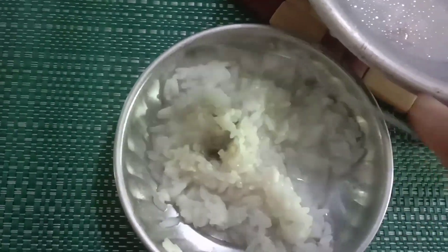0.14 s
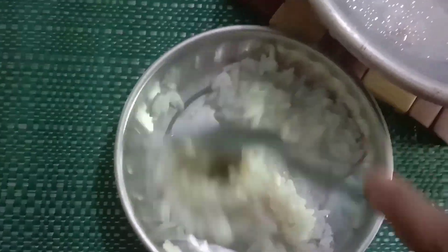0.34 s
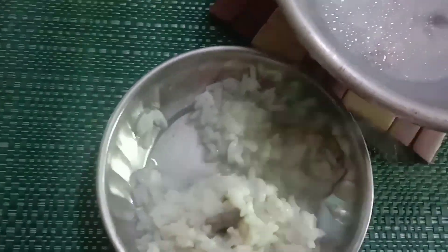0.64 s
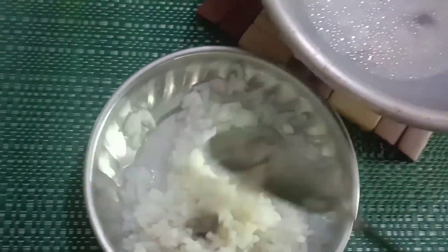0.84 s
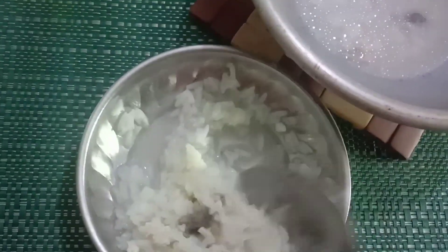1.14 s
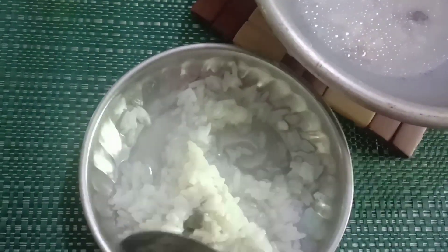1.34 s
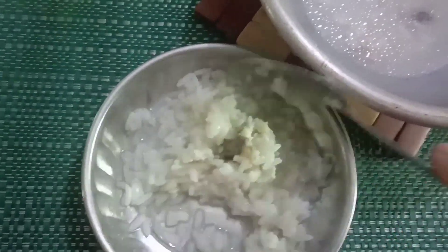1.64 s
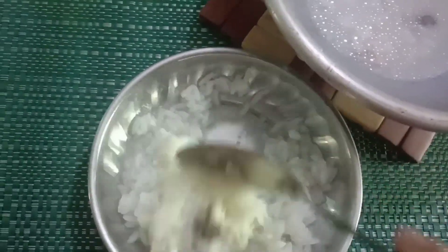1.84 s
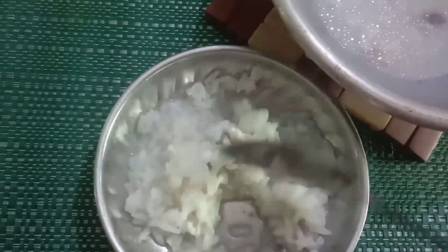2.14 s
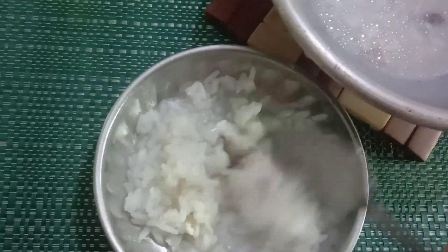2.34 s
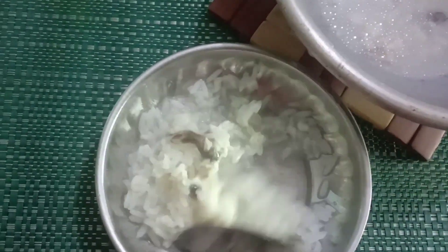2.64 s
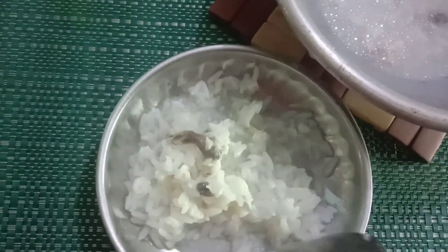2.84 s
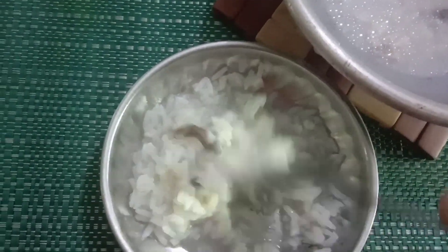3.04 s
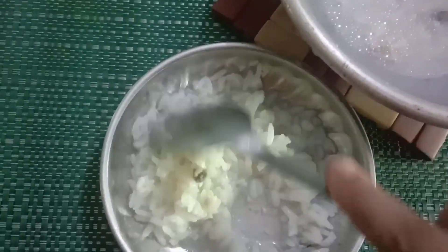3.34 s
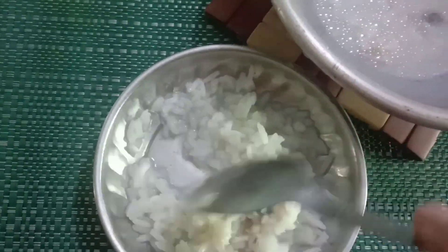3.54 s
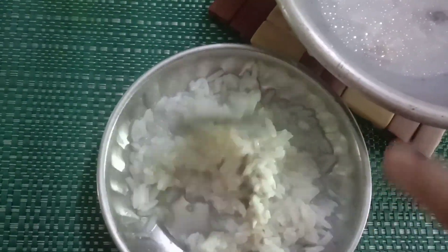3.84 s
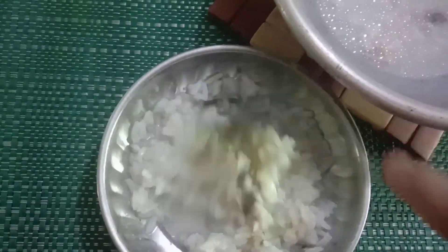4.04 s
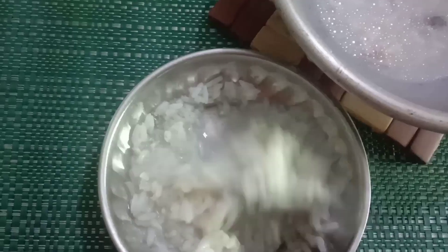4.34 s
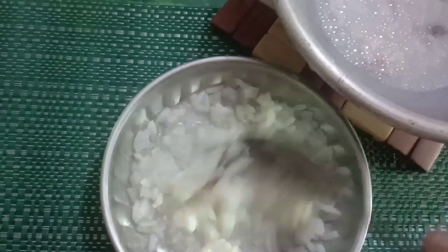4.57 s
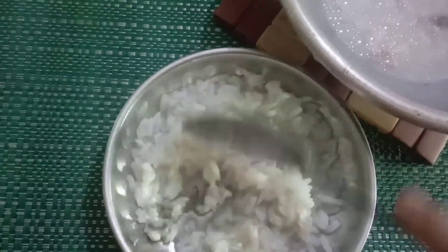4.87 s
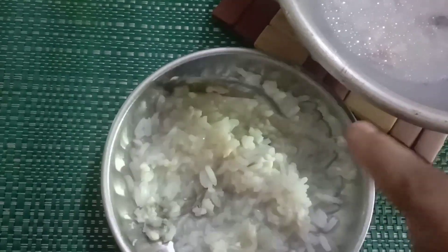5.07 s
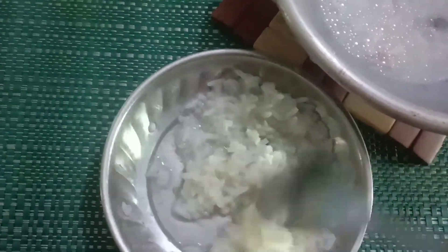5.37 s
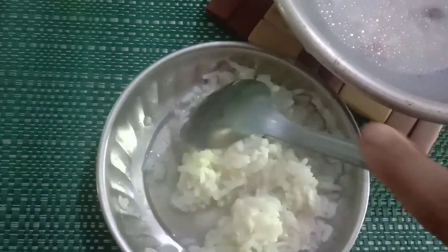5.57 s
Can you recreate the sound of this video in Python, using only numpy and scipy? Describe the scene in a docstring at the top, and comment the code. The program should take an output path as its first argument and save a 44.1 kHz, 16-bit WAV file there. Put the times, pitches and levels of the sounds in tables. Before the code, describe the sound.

A metal spoon clinks and scrapes against a steel plate while mixing cooked rice, over a faint hum in a small room.

```python
"""A steel spoon mixes cooked rice on a steel plate, which stands on a table mat in a small room.
Each impact excites the modes of spoon and plate (a clink) and, through the mat, the table (a soft thud).
Stick-slip friction makes the spoon scrape, and sticky grains tick as they let go. Rice damps the plate,
so it rings out only now and then. Behind it are a low, restless room noise, a faint hiss and hum
and, once, a thin far-off buzz."""
import sys
import numpy as np
from scipy import signal
from scipy.fft import rfft, irfft
from scipy.io import wavfile
from scipy.ndimage import map_coordinates

SR = 44100
rng = np.random.default_rng(int(sys.argv[2]) if len(sys.argv) > 2 else 0)


def store_wav(level_fs):
    """Save 16-bit WAV to argv[1]."""
    pcm = np.round(np.clip(np.atleast_2d(level_fs), -1, 1) * 32767)
    wavfile.write(sys.argv[1], SR, pcm.T.astype(np.int16))


N = 251811
T = np.arange(N) / SR


def amp(db):
    """Converts a level in decibels to an amplitude ratio."""
    return 10 ** (np.asarray(db) / 20)


def unit(x):
    """Normalises to rms 1."""
    return x / np.sqrt(np.mean(x ** 2) + 1e-20)


def read(points, hz):
    """Interpolates a table on a logarithmic frequency axis."""
    f, value = np.transpose(points)
    return np.interp(np.log(hz + 1), np.log(f + 1), value)


def add(mix, start_s, sound):
    """Superposition: adds a sound to the mix from a given time."""
    part = mix[max(round(start_s * SR), 0):][:len(sound)]
    part += sound[:len(part)]


def colour(x, *spectra):
    """Filters in cascade: their responses in decibels add."""
    hz = np.fft.rfftfreq(len(x), 1 / SR)
    return irfft(rfft(x) * amp(sum(read(s, hz) for s in spectra)), len(x))


def drift(knots_per_s):
    """Random modulation of rms 1, linear between Gaussian values."""
    knots = rng.standard_normal(int(T[-1] * knots_per_s) + 3)
    return unit(np.interp(T * knots_per_s, np.arange(len(knots)), knots))


def patchy(x, depth_db, wide_hz, long_s, size=1024):
    """Spectral modulation: small regions of frequency and time swell and sink at random."""
    frames = dict(fs=SR, nperseg=size, noverlap=size * 3 // 4)
    spectra = signal.stft(x, **frames)[2]
    row, column = np.indices(spectra.shape)
    where = [row * SR / size / wide_hz, column * size / 4 / SR / long_s]
    field = unit(map_coordinates(rng.standard_normal((256, 256)), where, order=1, mode="wrap"))
    return unit(signal.istft(spectra * amp(depth_db * field), **frames)[1][:len(x)])


def fuzzy_tone(hz, blur_per_s, fuzz):
    """Multipath interference: changing paths make a tone flutter in amplitude and phase."""
    paths = 1 + fuzz * (drift(blur_per_s) + 1j * drift(blur_per_s))
    return unit((paths * np.exp(2j * np.pi * hz * T)).real)


def ring(modes, t, spread_db=1.6):
    """Modal decay: damped sinusoids, their balance randomised as by a varying point of contact."""
    hz, db, t60 = np.transpose(modes)[:, :, None]
    envelopes = amp(db + spread_db * rng.standard_normal(hz.shape) - 60 * t / t60)
    return (envelopes * np.sin(2 * np.pi * (hz * t + rng.random(hz.shape)))).sum(0)


# spectrum of the room noise: (frequency [Hz], relative level [dB])
AIR_SPECTRUM = [(25, -40), (60, -33), (95, -10.5), (140, -13), (200, -12.5), (350, -11.5), (600, -17.5),
                (850, -12), (1280, -21), (1520, -14.5), (1900, -32), (2700, -30), (3600, -36), (4200, -56)]


def room_noise(level_db=-56.5, swell_db=0.38, swells_per_s=6):
    """Filtered noise: random modulation makes the low ambient sound restless."""
    noise = colour(rng.standard_normal(N), AIR_SPECTRUM)
    restless = patchy(noise, depth_db=3.4, wide_hz=80, long_s=.09)
    return restless * amp(level_db + swell_db * drift(swells_per_s))


# spectrum of the microphone hiss: (frequency [Hz], relative level [dB])
HISS_SPECTRUM = [(2500, -28), (3700, -12), (4300, -2), (5100, 5), (5700, -14.5), (6400, -9.5), (7000, 0.5),
                 (8000, -2), (9400, -3.5), (10400, -16), (15500, -58)]


def hiss(level_db=-66):
    """Microphone self-noise: a faint, flickering band in the treble."""
    noise = colour(rng.standard_normal(N), HISS_SPECTRUM)
    return amp(level_db) * patchy(noise, depth_db=1.7, wide_hz=220, long_s=.09)


# envelope of the hum: (time [s], relative level [dB])
HUM_ENVELOPE = [(0.0, -55.5), (1.3, -57), (1.4, -51.5), (1.55, -63), (1.73, -63), (1.88, -50), (2.2, -51),
                (2.5, -64), (3.0, -57), (4.7, -59.5), (4.9, -52.5), (5.71, -47.5)]


def hum(hz=354, gain_db=-4.5, waver_db=1.3, wavers_per_s=8):
    """Amplitude modulation: one rough tone swells, sinks and wavers."""
    envelope = amp(np.interp(T, *np.transpose(HUM_ENVELOPE)))
    tone = fuzzy_tone(hz, blur_per_s=36, fuzz=.9)
    return envelope * tone * amp(gain_db + waver_db * drift(wavers_per_s))


# crowded, rice-damped modes of the steel: (frequency [Hz], relative level [dB])
STEEL_RESPONSE = [(50, -58), (200, -11.5), (900, -16), (1500, -3.5), (2200, -6), (3200, -2), (4300, -3),
                  (5400, 0), (6700, 0.5), (7600, 2.5), (8100, -2.5), (8900, 5), (10000, -7.5), (13000, -15),
                  (16000, -22)]


def steel(force, lows_db, highs_db):
    """Forced response of the damped steel: a broad contact adds lows, a sharp edge highs."""
    # every point of contact favours other modes
    point = np.c_[np.arange(0, 16000, 160), 4.6 * rng.standard_normal(100)]
    tilt = [(3500, lows_db), (5200, 0.013), (9300, 0.0091), (11000, highs_db)]
    untilted_rms = np.std(colour(force, STEEL_RESPONSE, point))
    return colour(force, STEEL_RESPONSE, point, tilt) / untilted_rms


# impacts of spoon on plate; the faintest is a pat on the rice. Later dB columns are relative to the level:
# (time [s], level [dB], lows [dB], highs [dB], note frequency [Hz], note [dB], spoon ring [dB],
# plate ring [dB], thud [dB])
IMPACTS = [ (0.2363, -30, 6, 5, 5980, -1.5, -15, -41, -15), (0.346, -29.5, 7, -2, 6660, -5, -15, -44, -31),
           (0.6342, -40, 11, -22, 2600, 0, -34, -9, -32),
           (0.658, -27.5, -1, 8.5, 2520, -18, -6, -19.5, -16),
           (1.0752, -29.5, -13, 3, 3234, -11.5, -22, -50, -29),
           (1.6653, -28.5, -2, 3.5, 5664, 9.5, -33, -3, -50),
           (1.7213, -30.5, -2, -1, 7100, -3, -11, -4, -27),
           (1.7649, -25, 2.5, -7, 7280, -4.5, -39, -55, -39),
           (2.101, -73.5, -9, -12, 864, 23.5, -30, -26, -13),
           (2.2840, -28.5, -4.5, 5.5, 9540, -2.5, -20, -43, -22.5),
           (2.3272, -35.5, -5.5, 12.5, 6370, 2.5, -19, -42, -16.5),
           (2.3664, -32, -3.5, -1, 8600, 0, -20, -43, -24),
           (2.5978, -28, 4.5, -3, 8970, 1.5, -15, -47, -23),
           (2.964, -28.5, -4.5, 3, 8680, 2.5, -12, -36, -20),
           (2.984, -27.5, -1, -2, 6737, -5.5, -30, -54, -22.5),
           (3.333, -48.5, -17, 4, 9240, -4, -13, -20, -8.5),
           (3.4190, -30.5, 1.5, 0, 2490, -4.5, -27, -38, -22),
           (3.4873, -45, 4.5, 6, 3150, -1, -27, -31, -38), (3.677, -27, -5, 6.5, 3360, -9, -5.5, -50, -18),
           (5.0592, -33.5, 4, 3, 6550, -0.5, -9.5, -41, -12),
           (5.2292, -36, 11.5, 9, 2510, -3, -16, -19, -23), (5.2505, -36, 9.5, -5, 3190, -8, -26, -29, -24),
           (5.2800, -50, 19.5, 7, 2900, -14, -24, -30, -18), (5.303, -37, -32, 3, 7600, -3, -27, -37, -38),
           (5.341, -35.5, -3, 4, 8440, -2, -39, -47, -23), (5.7015, -32.5, 5, 2.5, 5730, -20, -5, -30, -28)]


def clinks(hold_s=0.0031, crack_t60=0.023, crack_db=-.5, note_db=2, note_t60=0.049):
    """Impact excitation: the spoon chatters briefly, with a short note set by where it touches."""
    out, t = np.zeros(N), T[:4096]
    chatter = amp(-60 * np.maximum(t - hold_s, 0) / crack_t60)
    chatter *= 1 + 0.2 * np.exp(-t / 0.0025)  # the first impact is the hardest
    for s, db, lows, highs, hz, note, *_ in IMPACTS:
        crack = steel(rng.standard_normal(len(t)), lows, highs) * chatter
        tone = ring([(hz, 0, note_t60)], t, spread_db=0.5)
        add(out, s, amp(db + crack_db) * crack + amp(db + note + note_db) * tone)
    return out


# response of the table under the mat: (frequency [Hz], relative level [dB])
TABLE_RESPONSE = [(40, -58), (90, -29), (134, 4), (175, -11), (260, -5.5), (420, -26), (900, -19),
                  (2000, -98)]


def thuds(swell_s=0.019, fade_s=0.046):
    """Structure-borne sound: each blow passes through the mat, and the table's boom builds and dies."""
    out, t = np.zeros(N), T[:16384]
    envelope = (1 - np.exp(-(t / swell_s) ** 2)) * np.exp(-t / fade_s)
    envelope /= envelope.max()
    envelope_rms = np.sqrt(np.mean(envelope ** 2))
    for s, db, *_, thud in IMPACTS:
        boom = unit(colour(rng.standard_normal(len(t)), TABLE_RESPONSE) * envelope)
        add(out, s, amp(db + thud) * envelope_rms * boom)
    return out


# natural modes of spoon and plate: (frequency [Hz], relative level [dB], 60 dB decay time [s])
SPOON_MODES = [(1515, -18, .2), (4990, -12, .2), (5912, -8, .25), (6290, -12, .18), (6900, -9, .18),
               (7646, -1, .31), (7688, -7, .25), (8678, -10, .26), (8932, -7, .26), (9430, -9, .23),
               (9889, -16, .2), (11075, -12, .21), (12765, -19, .24), (13240, -21, .24)]
PLATE_MODES = [(1308, -10, .1), (1816, -5, .85), (1868, -14, .5), (2226, -3, .5), (2319, -2, .55),
               (2587, -13, .4), (2697, -3, .25), (2738, 2, .26), (3704, -8, .25), (3903, -7, .4),
               (4151, -14, .45), (4775, -7, .1), (5489, -3, .1), (5683, -9, .22), (5927, -11, .38),
               (8409, -16, .3)]


def ringing(spoon_db=2.0, plate_db=-3.0, loss_per_touch_db=2):
    """Free vibration: spoon and plate ring after each blow; every later impact damps what remains."""
    out, t = np.zeros(N), T[:22000]
    times = np.sort([row[0] for row in IMPACTS])
    for s, db, *_, spoon, plate, _ in IMPACTS:
        spoon_ring = amp(spoon + spoon_db) * ring(SPOON_MODES, t)
        plate_ring = amp(plate + plate_db) * ring(PLATE_MODES, t)
        touches = np.searchsorted(times[times > s], s + t)
        add(out, s, amp(db - loss_per_touch_db * touches) * (spoon_ring + plate_ring))
    return out


# reverberation of the small room: (frequency [Hz], 60 dB decay time [s])
REVERB_TIMES = [(150, 0.58), (700, 0.58), (2000, 0.21), (5000, 0.26), (9000, 0.23), (14000, 0.18)]


def room(x, first_s=0.0055, echoes_per_s=4000):
    """Reverberation: dense reflections from near walls, each band decaying at its own rate."""
    t = T[:SR * 2 // 3]
    echoes = rng.choice([-1., 1.], len(t)) * (rng.random(len(t)) < echoes_per_s / SR)
    hz, delay_s, spectra = signal.stft(echoes, SR, nperseg=256)
    decay = amp(-60 * delay_s / read(REVERB_TIMES, hz)[:, None])
    tail = signal.istft(spectra * decay, SR, nperseg=256)[1][:len(t)] * (t > first_s)
    return signal.fftconvolve(x, tail / np.linalg.norm(tail))[:N]


# drags of the spoon's edge over the steel:
# (start [s], hardest moment [s], end [s], level [dB], squeak frequency [Hz], relative squeak level [dB])
DRAGS = [ (0.285, 0.322, 0.36, -48, 8880, -5), (0.375, 0.41, 0.44, -40.5, 5420, -7.5),
         (0.659, 0.667, 0.78, -39, 7670, -4), (1.104, 1.159, 1.174, -47, 3190, -3.5),
         (1.773, 1.817, 1.856, -42, 6430, -4), (2.289, 2.317, 2.43, -46, 10800, -7),
         (2.622, 2.638, 2.72, -46, 5870, -5), (2.989, 3.03, 3.07, -50, 8760, 4.5),
         (3.383, 3.48, 3.48, -41.5, 7780, -4.5), (3.68, 3.697, 3.805, -37, 7610, -1),
         (5.12, 5.15, 5.22, -43, 4180, -7), (5.188, 5.22, 5.25, -45, 9100, -7),
         (5.258, 5.332, 5.38, -43.5, 8800, -9)]


def scrapes(slips_per_s=1400, ends_db=-11, squeak_t60=.03):
    """Stick-slip friction: tiny, uneven slips excite changing modes of the steel and a short squeak."""
    out, t = np.zeros(N), T[:16384]
    for start, hardest, end, db, hz, squeak_db in DRAGS:
        slips = (rng.random(len(t)) < slips_per_s / SR) * rng.choice([-1, 1], len(t))
        slips = slips * amp(3 * np.minimum(rng.exponential(1, len(t)), 4))
        rattle = steel(slips, lows_db=-3, highs_db=3)
        grit = patchy(rattle, depth_db=6, wide_hz=280, long_s=.012, size=256)
        squeak = unit(signal.fftconvolve(slips, ring([(hz, 0, squeak_t60)], t))[:len(t)])
        pressure = amp(np.interp(start + t, [start, hardest, end], [ends_db, 0, ends_db]))
        touching = np.clip(np.minimum(t, end - start - t) / .006, 0, 1)
        add(out, start, amp(db) * (grit + amp(squeak_db) * squeak) * pressure * touching)
    return out


def rice_ticks(count=6, tick_db=-69, fade_s=0.005):
    """Release of adhesion: at random times sticky grains leave the steel with a tiny, bright tick."""
    out, t = np.zeros(N), T[:2048]
    for s in rng.uniform(0, T[-1], count):
        tick = steel(rng.standard_normal(len(t)), lows_db=-8, highs_db=8) * np.exp(-t / fade_s)
        add(out, s, amp(tick_db) * tick)
    return out


# partials of the far-off buzz: (frequency [Hz], level [dB])
BUZZ_PARTIALS = [(3731, -63.5), (3957, -71.5), (4183, -63), (4430, -72), (4657, -70.5)]


def buzz(start_s=4.34, attack_s=0.1, end_s=5.2, release_s=0.071):
    """Roughness: high partials that flutter independently make a thin buzz that holds, then fades."""
    cluster = sum(amp(db) * fuzzy_tone(hz, blur_per_s=85, fuzz=1.4) for hz, db in BUZZ_PARTIALS)
    envelope = np.clip(np.minimum((T - start_s) / attack_s, (end_s - T) / release_s), 0, 1)
    return cluster * envelope


def scene(room_db=-6):
    """Superposition of all sources; only the short contact sounds feed the reverberation."""
    contacts = clinks() + scrapes() + rice_ticks()
    mixing = contacts + amp(room_db) * room(contacts) + ringing() + thuds()
    return (mixing + room_noise() + hiss() + hum() + buzz())[None]


def record(dry):
    """Band limiting: a linear-phase low-pass filter removes the highest treble."""
    lowpass = signal.firwin(301, cutoff=15900, window=("kaiser", 8), fs=SR)
    return signal.oaconvolve(dry, lowpass[None], "same")


dry = scene()
out = record(dry)
store_wav(out)
```